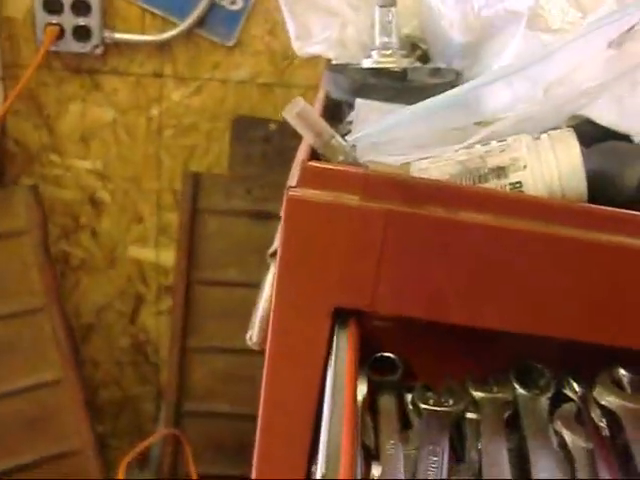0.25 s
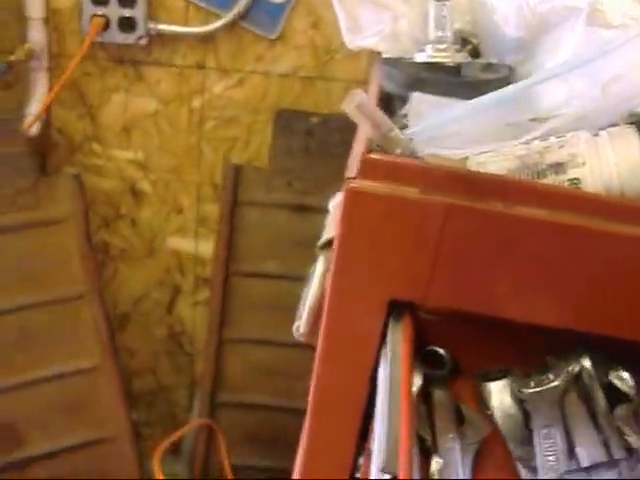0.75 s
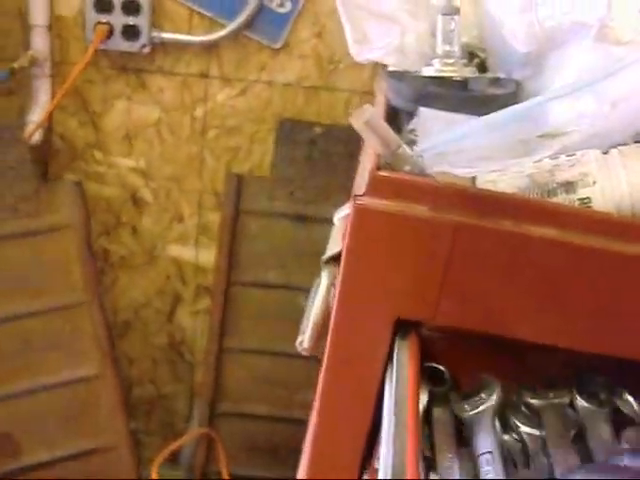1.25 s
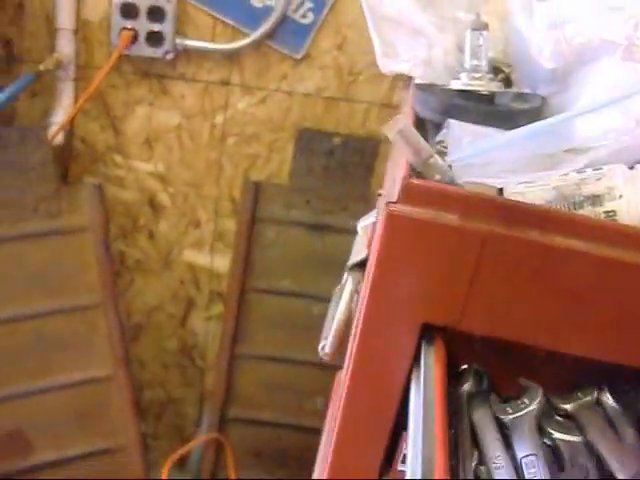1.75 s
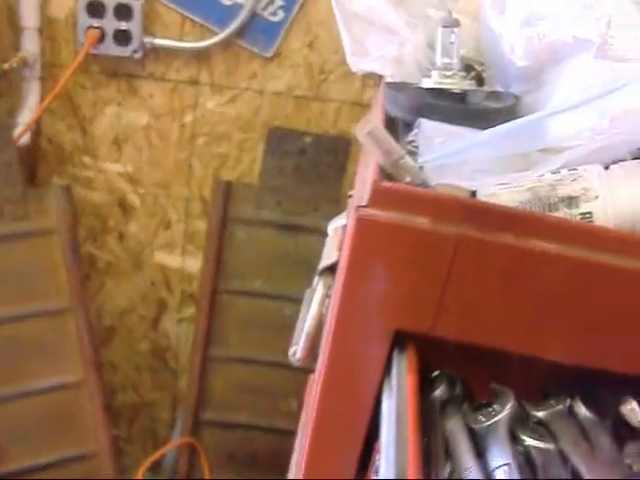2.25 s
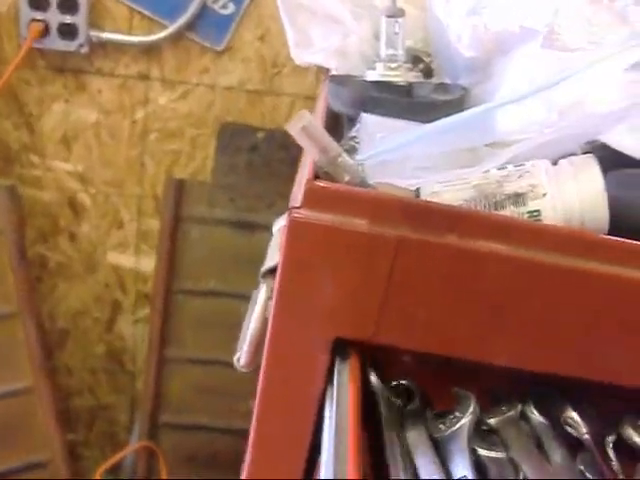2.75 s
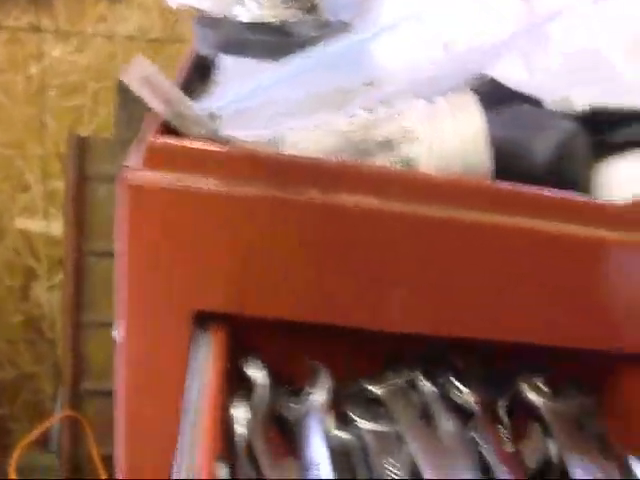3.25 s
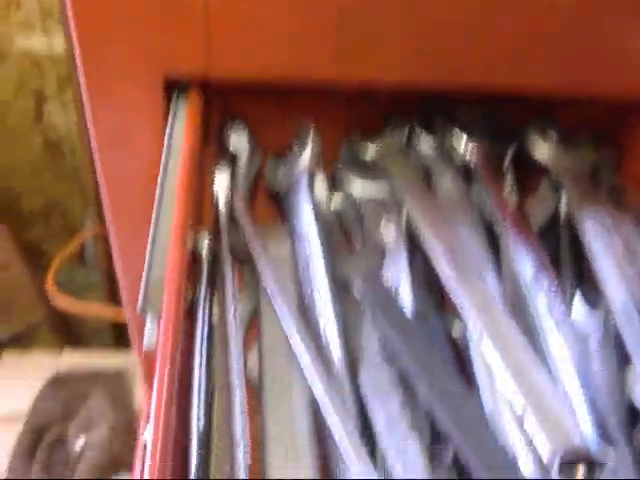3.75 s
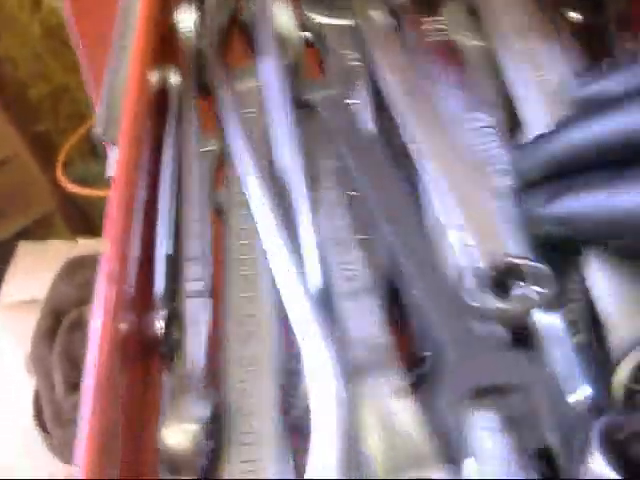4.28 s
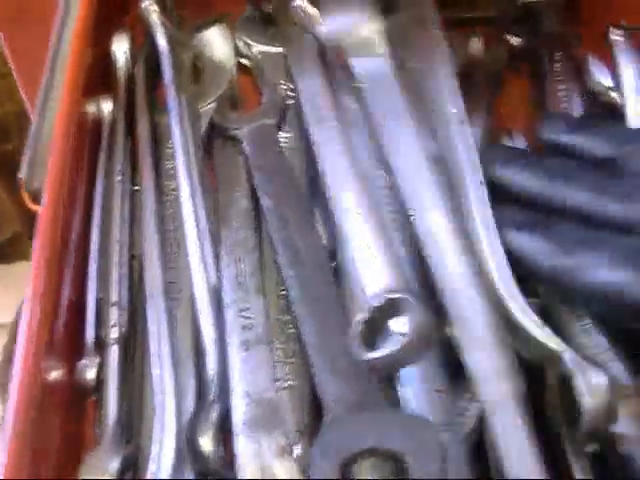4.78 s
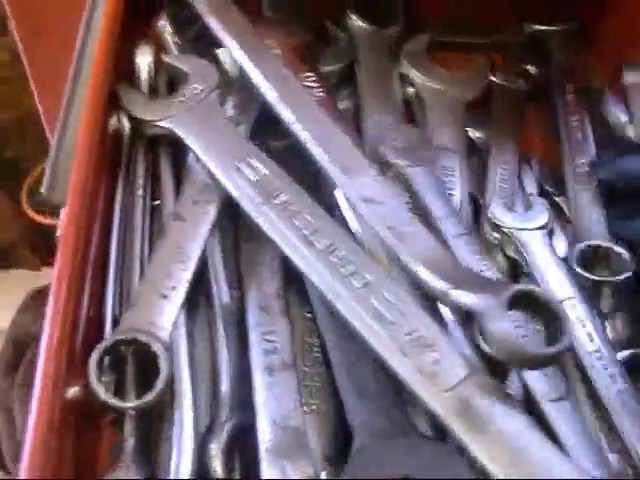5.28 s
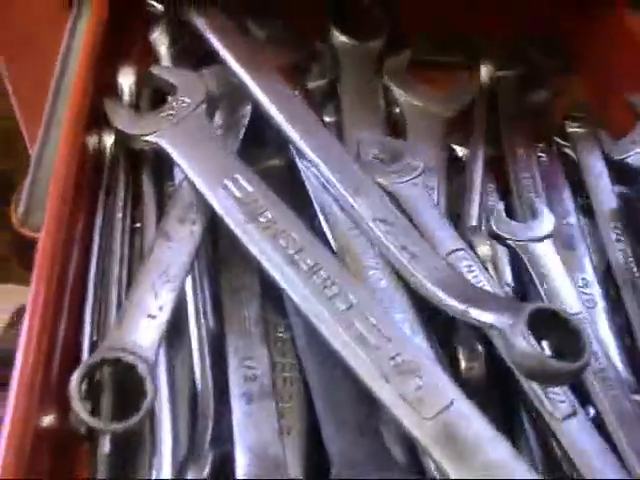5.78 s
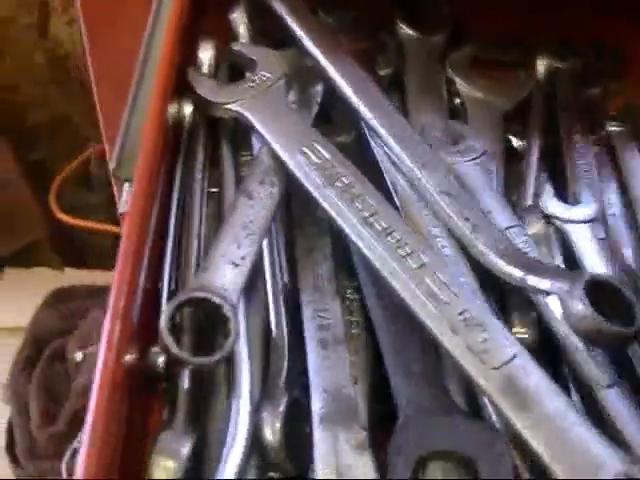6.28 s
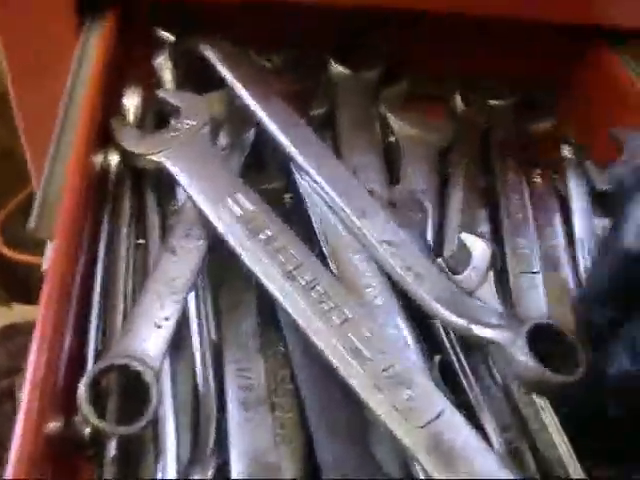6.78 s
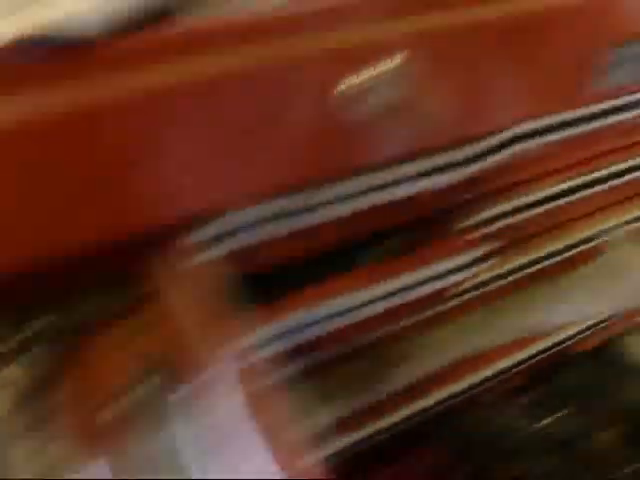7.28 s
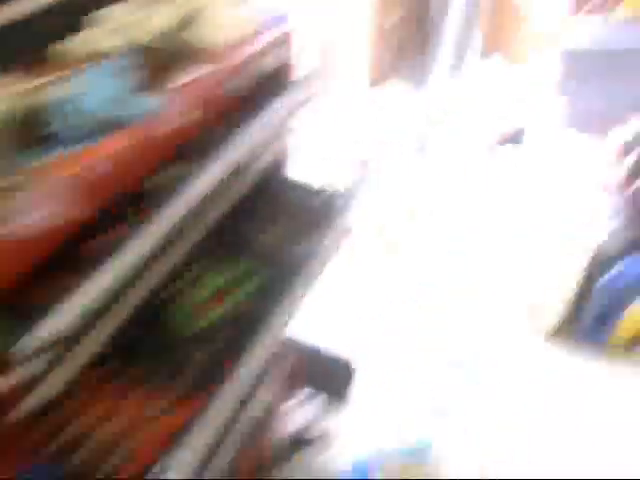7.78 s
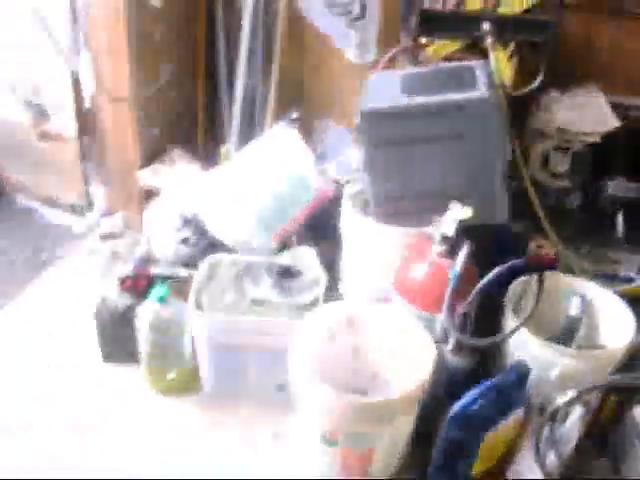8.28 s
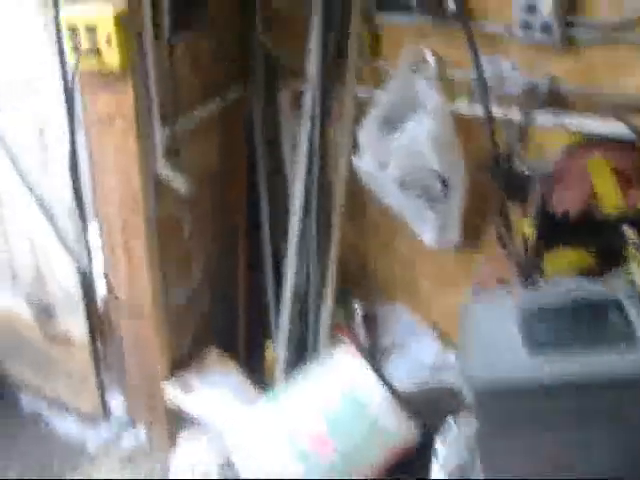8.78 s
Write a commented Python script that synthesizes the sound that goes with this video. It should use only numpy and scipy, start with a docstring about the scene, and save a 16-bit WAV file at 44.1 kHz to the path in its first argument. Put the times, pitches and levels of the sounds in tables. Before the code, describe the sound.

Steel wrenches are shoved and dropped on one another in a tool chest drawer, close and loud, in a fairly dry workshop with a soft low hum. Bursts of bright clatter alternate with near-quiet and small dull knocks; the longest run comes in the middle. A last jangling burst ends abruptly, leaving rough room noise that swells slightly and sparse faint clicks.

```python
"""Over a quiet, humming workshop, a gloved hand rummages through steel wrenches in a tool chest drawer.
Clacks and dragging are shaped noise: jangling cracks that also shake the sheet-metal drawer pan.
Dull knocks push noise into the pan's resonances; wrenches hanging free ring as fading sine tones
until they touch the pile again. Shoves sound the low tones of the whole chest.
The workshop is filtered noise with a wavering hum, and a faint tail follows the tools."""
import sys
import numpy as np
from scipy import signal
from scipy.fft import rfft, irfft, next_fast_len
from scipy.io import wavfile
from scipy.ndimage import uniform_filter1d, map_coordinates

SR = 44100
rng = np.random.default_rng(int(sys.argv[2]) if len(sys.argv) > 2 else 0)


def bounce(signal):
    """Save signal as a 16-bit WAV file at the path given by the first command-line argument."""
    frames = np.transpose(np.atleast_2d(signal))
    limited = np.clip(frames, -1, 1)
    pcm = np.round(limited * 32767).astype(np.int16)
    wavfile.write(sys.argv[1], SR, pcm)


N = 398223  # length of the scene in samples

# Levels of the tools are before the gains in the layer functions. A t60 is the time to fade by 60 dB.
# colour of the workshop noise, relative: (frequency [Hz], level [dB])
WORKSHOP_COLOUR = [(13, -34), (22, -18.5), (85, -1), (175, -11.5), (207, -6), (350, -11), (501, -13),
                   (847, -13), (1840, -18.5), (3290, -23.5), (4330, -31), (14600, -49.5), (16400, -47)]
# how loud the workshop is: (time [s], background level [dB], hum level [dB])
WORKSHOP_LEVELS = [(0, -56.5, -56), (.5, -52.5, -71), (.9, -59, -68), (2, -58, -61.5), (3.5, -60, -71),
                   (3.95, -57.5, -63.5), (6.2, -57.5, -61), (7.4, -59.5, -70.5), (8.2, -54.5, -63.5),
                   (8.7, -50.5, -57.5), (9.03, -51.5, -47.5)]
# strokes of the hand, each dragging the pile into a continuous rattle:
# (start [s], end [s], level at the start [dB], level at the end [dB])
STROKES = [(0, 0.145, -26, -34.5), (0.572, 0.72, -17.5, -22), (.725, 0.79, -28, -42.5),
           (1.142, 1.203, -37, -33.5), (1.207, 1.378, -20.5, -25), (1.39, 1.61, -34.5, -30.5),
           (1.62, 1.764, -17.5, -27.5), (1.946, 2.104, -63, -48.5), (2.157, 2.277, -50.5, -44.5),
           (2.496, 2.593, -45, -39.5), (2.731, 2.856, -28.5, -29), (2.87, 2.942, -39, -43.5),
           (2.994, 3.105, -44, -39.5), (3.099, 3.299, -26.5, -26), (3.3, 3.38, -32.5, -45.5),
           (4.04, 4.188, -43, -44), (4.256, 4.321, -48.5, -34), (4.332, 4.499, -19, -20),
           (4.505, 4.724, -24.5, -29.5), (4.792, 4.84, -24.5, -26.5), (4.849, 5.147, -24, -23),
           (5.161, 5.333, -24, -29), (5.34, 5.39, -36.5, -42.5), (5.403, 5.464, -26, -22),
           (5.472, 5.603, -16, -22), (5.62, 5.69, -50, -41.5), (5.692, 5.818, -21.5, -31.5),
           (5.844, 5.907, -27.5, -41.5), (6.418, 6.543, -24, -23), (6.552, 6.58, -35, -37),
           (6.595, 6.744, -25, -25), (6.74, 6.862, -25, -37), (6.908, 7.002, -39.5, -26.5),
           (7.007, 7.181, -19, -25), (7.17, 7.248, -32, -44.5), (7.86, 8.008, -60, -61)]
# one wrench sliding briefly over another, swelling and fading: (middle [s], level [dB], length [s])
SLIDES = [(.641, -16, .04), (.68, -15, .06), (0.733, -24.5, 0.054), (3.129, -22.5, 0.015),
          (3.237, -19, 0.022), (4.45, -12, .07), (4.87, -16.5, 0.02), (4.969, -17, 0.086),
          (5.018, -18, 0.03), (5.072, -16.5, 0.045), (5.184, -16.5, 0.022), (5.23, -16.5, 0.036),
          (5.291, -24.5, 0.034), (5.502, -20, .04), (5.595, -23.5, 0.043), (6.448, -17, 0.013),
          (6.53, -20, 0.027), (6.654, -16.5, 0.019), (7.033, -16, 0.06), (7.89, -55, .05)]
# separate clacks of steel on steel: (time [s], peak level [dB], treble over the peak [dB])
CLACKS = [(0.017, -12, -18), (0.055, -1.5, -10.5), (0.073, -1, -13), (0.101, -15, -14), (0.131, -16, -11),
          (0.219, -38, -22), (0.548, -24, -24), (0.559, -14, -10), (0.57, -1, -12.5), (0.61, 1, -16),
          (0.624, 2, -13), (0.666, -1.5, -13), (0.744, -17.5, -14), (1.055, -41, -20), (1.141, -14.5, -9.5),
          (1.182, -11.5, -18), (1.211, -4, -14.5), (1.239, 0.5, -12), (1.271, 0.5, -10), (1.326, -4, -8.5),
          (1.366, -7.5, -10), (1.455, -16.5, -14), (1.47, -17, -8), (1.479, -8, -10.5),
          (1.518, -7.5, -25.5), (1.575, -17.5, -16), (1.618, -4, -7.5), (1.681, -10, -9.5),
          (1.696, -3, -8.5), (1.714, 3.5, -19.5), (1.81, -14, -12), (1.954, -46, -20), (2.075, -36, -22),
          (2.094, -34.5, -27), (2.168, -37, -24), (2.181, -29, -19), (2.195, -28.5, -14), (2.227, -34, -23),
          (2.276, -37, -15), (2.387, -33, -22), (2.396, -36, -22), (2.468, -35, -20), (2.504, -27.5, -18),
          (2.52, -31, -8), (2.556, -3, -11.5), (2.589, -24, -18), (2.662, -33, -22), (2.724, -8, -20),
          (2.75, -8, -15), (2.763, 2.5, -11), (2.785, -1.5, -11), (2.806, 0, -9.5), (2.849, -3.5, -17),
          (2.863, -8, -15), (2.991, -25.5, -30), (3.007, -10, -15.5), (3.049, -18, -15),
          (3.058, -17.5, -19), (3.081, -21, -25), (3.101, -11, -9), (3.108, 3, -13), (3.197, -3.5, -11.5),
          (3.263, 4.5, -8.5), (3.375, -22, -17), (4.032, -25, -16.5), (4.047, -21.5, -20),
          (4.067, -10, -15), (4.14, -12, -21), (4.152, -10, -12.5), (4.192, -21.5, -11),
          (4.253, -18, -10.5), (4.291, -29, -13), (4.299, -12.5, -11), (4.321, -9.5, -14.5),
          (4.331, -4, -20.5), (4.36, -2.5, -12.5), (4.377, -1.5, -9), (4.417, 3, -12), (4.431, -1, -11),
          (4.549, -6.5, -11.5), (4.58, -14.5, -7), (4.61, -0.5, -6.5), (4.654, -6.5, -16), (4.694, -11, -7),
          (4.765, -16, -8), (4.784, -3, -16), (4.822, -7, -9), (4.839, 0.5, -11), (4.89, -5.5, -2.5),
          (4.921, -2, -15), (4.941, 1, -10), (5.046, -5, -13), (5.063, -2.5, -16), (5.116, -1.5, -14),
          (5.162, -3, -8.5), (5.227, -8.5, -12), (5.267, -10, -10), (5.401, -11, -4), (5.444, -7, -21),
          (5.473, -4.5, -18), (5.533, -1.5, -11), (5.592, -17, -14), (5.691, -3, -8), (5.741, -3, -8.5),
          (5.765, -2, -9), (5.845, -11.5, -6), (5.871, -5, -16), (5.932, -21, -13.5), (6.036, -22, -6),
          (6.046, -9, -1.5), (6.124, -15, -12), (6.145, -20.5, -21), (6.197, -29, -17), (6.266, -41, -8),
          (6.39, -38, -20), (6.407, -16, -4.5), (6.434, -9.5, -10.5), (6.471, -3, -11), (6.493, -1.5, -5),
          (6.582, -11, -12), (6.597, -2.5, -14.5), (6.639, -5, -7.5), (6.691, -4, -10), (6.707, 2, -12.5),
          (6.762, -9.5, -8), (6.802, -8.5, -13), (6.817, -8.5, -13), (6.846, -8.5, -23), (6.884, -26, -17),
          (6.917, -5, -18.5), (6.959, -13, -9), (6.971, -8, -3.5), (7.008, -3, -6.5), (7.072, -1, -13.5),
          (7.108, 3.5, -14), (7.141, 2, -15.5), (7.201, -8.5, -14), (7.246, -4.5, -14.5),
          (8.583, -23.5, -15), (8.615, -29, -7), (8.631, -28.5, -9), (8.638, -30, -6), (8.962, -30, -4)]
# colour of a crack, relative: (frequency [Hz], level [dB])
STEEL_COLOUR = [(410, -19), (700, -0.5), (911, -8), (1450, -1.5), (3500, -1), (4730, -4), (6500, 1),
                (7030, 0.5), (11000, 2.5), (15300, -19), (16400, -60)]
# resonances of the drawer's sheet-metal pan: (frequency [Hz], width [Hz], relative level [dB])
PAN_MODES = [(294, 110, -4.5), (500, 80, 1.5), (610, 100, 1.5), (763, 90, 1.5), (1023, 100, 2),
             (1447, 120, 2), (2180, 180, -3), (2760, 320, -12)]
# how strongly the pan answers, over the rule for its knock: (time [s], level [dB])
PAN_LEVEL = [(0, -1), (1.3, -1.5), (2.2, 3), (2.8, 2.5), (4.1, -1), (4.6, 1.5), (5.3, -1), (5.7, 1.5),
             (6.1, -3.5), (7.1, 1.5), (9, -4)]
# dull knocks on the pan, each waking the resonances near one pitch:
# (time [s], level [dB], pitch [Hz], t60 [s])
KNOCKS = [(.03, -26, 750, 0.091), (1.96, -47, 800, .08), (2.074, -41.5, 700, 0.081), (2.094, -44, 900, .05),
          (2.18, -40, 1100, .08), (2.195, -42, 1497, .05), (2.226, -40, 797, 0.078),
          (2.243, -39, 900, 0.08), (2.387, -41, 1100, 0.097), (2.468, -43, 1900, .04),
          (2.665, -38, 1500, .07), (3.2, -22, 1450, .1), (3.222, -24, 900, .06), (4.92, -15, 749, .07),
          (4.94, -16, 600, .06), (5.075, -23, 550, .06), (6.975, -25, 650, .08), (7.108, -18, 650, 0.075),
          (8.583, -37, 2100, .06), (8.647, -44, 1600, .03), (8.53, -44, 450, .07), (8.79, -47, 1300, .2),
          (8.91, -43, 2000, .08)]
# tones of each wrench, by wrench name: (frequency [Hz], level [dB], t60 [s])
WRENCH_MODES = { "long": [(1468, -4, .13), (4476, 4, .15), (5660, -4, .1), (7425, -6, .22), (9043, -3, .1),
                (9865, -9, .12), (10897, -3, .25), (12770, -15, .15), (13525, -4, .12), (14270, -16, .17)],
                "wide": [(4952, -8, .2), (5360, -7, .1), (6420, 0, .22), (9195, -3, .18), (11154, -11, .2),
                (12790, -20, .2)], "bent": [(6460, -2, .15), (8268, 0, .15), (11490, -8, .15),
                (12489, -3, .12), (13700, -12, .15)], "thin": [(7665, 0, .25), (11412, -8, .15),
                (13010, -14, .15), (13650, -20, .15), (14860, -16, .15)], "short": [(9060, -2, .15),
                (11326, 0, .25), (12320, -9, .15), (13250, -15, .2)], "stubby": [(6503, -8, .15),
                (9517, -5, .15), (10594, 0, .25)], "flat": [(5986, -7, .17), (8139, -10, .15),
                (9948, -6, .12), (11068, -3, .15), (14090, -20, .2)], "dark": [(8150, 0, .1),
                (8705, -10, .5), (9385, -5, .25), (12700, -14, .25), (14280, -17, .25)],
                "small": [(6675, -6, .15), (10335, 0, .25), (13135, -12, .2), (14771, -14, .25)]}
# blows that leave a wrench ringing: (time [s], wrench name, level [dB], time until it is damped [s])
RINGS = [(0.611, "long", -22, 0.12), (.7, "dark", -40, 0.17), (1.246, "dark", -17.5, .1),
         (1.24, "wide", -21.5, 0.08), (1.327, "wide", -11, 0.085), (1.618, "short", -16, 0.094),
         (1.68, "long", -22, 0.09), (2.772, "long", -26.5, 0.06), (3.164, "long", -26.5, 0.035),
         (3.198, "long", -20, 0.04), (3.257, "long", -15, 0.22), (4.432, "dark", -20, .05),
         (4.453, "wide", -16, .1), (4.553, "long", -29, 0.055), (4.63, "stubby", -31, 0.07),
         (4.691, "stubby", -23.5, 0.055), (4.84, "bent", -15.5, 0.074), (4.94, "dark", -14, 0.088),
         (4.989, "short", -20.5, .06), (5.044, "small", -17.5, 0.14), (5.081, "thin", -16.5, 0.08),
         (5.115, "thin", -17, 0.014), (5.23, "thin", -23, 0.045), (5.263, "thin", -18, 0.071),
         (5.4, "short", -23, 0.072), (5.532, "small", -20, 0.08), (5.551, "long", -28.5, .07),
         (5.69, "flat", -25, .05), (5.745, "thin", -23, .1), (5.773, "flat", -18, 0.059),
         (6.444, "short", -25, .05), (6.469, "dark", -21, 0.11), (6.51, "small", -20.5, 0.044),
         (6.638, "flat", -13, 0.017), (6.719, "flat", -20, 0.03), (6.758, "flat", -21, 0.034),
         (7.013, "short", -30.5, 0.026), (7.052, "short", -18, 0.085), (7.155, "short", -20, 0.11),
         (7.247, "small", -47, 0.35)]
# shoves that shake the whole chest: (time [s], level [dB])
THUMPS = [(0.63, -33), (1.67, -45), (3.26, -23), (4.425, -24), (4.455, -29), (4.579, -37), (4.84, -24),
          (4.87, -31), (4.957, -22), (4.982, -25), (5.063, -23), (5.088, -28), (5.115, -25), (5.53, -29),
          (5.692, -25), (6.492, -30), (6.655, -36), (7.005, -31), (7.105, -32), (8.312, -44), (8.53, -42)]
# low tones of the whole chest: (frequency [Hz], level [dB])
CHEST_MODES = [(55, -6), (95, -4), (160, -2), (260, 1)]
# how long the drawer and room answer: (frequency [Hz], t60 [s])
TAIL_T60 = [(200, .3), (2000, .2), (15000, .1)]

HUM_HZ = 188
FIRM_DB = -12  # level of a firm contact
# knock of the pan under a firm clack, and its change per dB of strength: softer ones are mostly pan
KNOCK_DB, KNOCK_PER_DB = -10, -0.5
# treble of a firm drag over its body, and its change per dB: gentler ones are duller
DRAG_BRIGHT_DB, DRAG_BRIGHT_PER_DB = -3, 0.85
DRAG_KNOCK_DB, DRAG_KNOCK_PER_DB = -0.5, 0.23  # the same for the pan under a drag
CREST_DB = 11  # peak of a clack over its rms
RISE_S = 0.0039  # time in which a clack comes up by 60 dB
DECAY_S, DECAY_S_PER_DB = 0.078, 0.0012  # t60 of a firm clack; softer ones die sooner
EDGE_LASTS, PAN_LASTS = 0.61, 1.5  # times the body's t60: treble dies faster, the pan slower
GRIP_S, SETTLE_S = 0.05, 0.081  # time for a stroke to rise and to die away by 60 dB
KNOCK_SPREAD = 0.6  # how far from its pitch a knock reaches [octaves]
THUMP_RISE_S, THUMP_T60_S = 0.0046, 0.1
TOP_HZ = 16400  # no sound is kept from here up


def amp(db):
    """Turns decibels into a gain."""
    return 10 ** (np.asarray(db) / 20)


def unit(x):
    """Scales a sound to an rms of 1."""
    return x / np.sqrt(np.mean(x ** 2) + 1e-20)


def along(points, hz):
    """Reads a curve of (frequency, value) points on a log frequency axis."""
    f, v = np.transpose(points)
    return np.interp(np.log(hz + 1), np.log(f + 1), v)


def curves(rows):
    """Gives one value per sample for each column after the time."""
    times, *columns = np.transpose(rows)
    return [np.interp(np.arange(N) / SR, times, column) for column in columns]


def wobble(rate):
    """Draws a smooth random curve through `rate` random points a second."""
    points = rng.standard_normal(int(N * rate / SR) + 4)
    return map_coordinates(points, [np.arange(N) * rate / SR])


def filtered(x, response):
    """Multiplies the spectrum of x by a function of frequency."""
    m = next_fast_len(N + SR // 2)  # spare room keeps the end from wrapping onto the start
    return irfft(rfft(x, m) * response(np.fft.rfftfreq(m, 1 / SR)), m)[..., :N]


def noise(spectrum):
    """Coloured noise of rms 1."""
    return unit(filtered(rng.standard_normal(N), lambda hz: amp(along(spectrum, hz))))


def workshop():
    """Patchy background noise, a thin hiss, and a low hum made of a narrow band of noise that wavers."""
    air_db, hum_db = curves(WORKSHOP_LEVELS)
    air = amp(air_db + 0.8 * wobble(7)) * noise(WORKSHOP_COLOUR)
    hiss = amp(air_db - 11.5) * noise([(1500, -28.5), (4000, 0.5), (15000, -4.5)])
    band = filtered(rng.standard_normal(N), lambda hz: 1 / (1 + ((hz - HUM_HZ) / 10) ** 2))
    hum = amp(hum_db + 2.5 * wobble(6.9)) * unit(band)
    return air + hiss + hum


def jangle(depth):
    """White noise in which scattered narrow modes flare up and die, as in a heap of loose steel."""
    hz, _, z = signal.stft(rng.standard_normal(N), SR, nperseg=768, noverlap=640)
    struck = (rng.random(z.shape) < 0.012) * amp(3.5 * rng.standard_normal(z.shape))
    spread = uniform_filter1d(struck, size=2, axis=0)
    dying = signal.lfilter([1], [1, -amp(-1.3)], spread, axis=1)  # 1.3 dB lost per frame
    # low modes are damped by the pile, high ones stand out
    freedom = 0.12 + 0.88 / (1 + (5000 / (hz[:, None] + 1)) ** 4)
    flaring = z * (1 + depth * freedom * unit(dying))
    return signal.istft(flaring, nperseg=768, noverlap=640)[1][:N]


def steel_bands(split_hz):
    """The jangle in the colour of steel, as a lower and an upper part of equal rms."""
    crack = filtered(jangle(depth=1.8), lambda hz: amp(along(STEEL_COLOUR, hz)))
    upper = filtered(crack, lambda hz: 1 / (1 + (split_hz / (hz + 1)) ** 6))
    return unit(crack - upper), unit(upper)


def pan(hz):
    """Response of the sheet-metal pan: a sum of resonances whose signs alternate."""
    response = 0
    for k, (centre, width, db) in enumerate(PAN_MODES):
        push = 1j * hz * width
        response = response + (-1) ** k * amp(db) * push / (centre * centre - hz * hz + push)
    return response


def shares(db, bright_db, knock_db, knock_slope):
    """Levels of body, bright edge and pan knock for a contact of this strength."""
    return db + np.array([0 * db, bright_db, knock_db + knock_slope * (db - FIRM_DB)])


def drag_shares(db):
    """Shares for dragged steel: gentler is duller."""
    bright_db = DRAG_BRIGHT_DB + DRAG_BRIGHT_PER_DB * (db - FIRM_DB)
    return shares(db, bright_db, DRAG_KNOCK_DB, DRAG_KNOCK_PER_DB)


def add_strokes(drags):
    """Adds the rattle of each stroke, which rises, runs from one level to another and settles."""
    for start, end, start_db, end_db in STROKES:
        first = max(round((start - GRIP_S) * SR), 0)
        last = min(round((end + SETTLE_S) * SR), N)
        span = np.arange(first, last)
        times = [start - GRIP_S, start, end, end + SETTLE_S]
        levels_db = [start_db - 60, start_db, end_db, end_db - 60]
        drags[:, span] += amp(2 * drag_shares(np.interp(span / SR, times, levels_db)))


def contact_powers():
    """Power of the crack's body, bright edge and pan knock: for the clacks, and for slides and rattle."""
    hits, drags = np.zeros((2, 3, N + SR))
    t = np.arange(-SR // 10, SR // 4) / SR
    for s, peak_db, bright_db in CLACKS:
        strength_db = peak_db - CREST_DB
        t60 = DECAY_S + DECAY_S_PER_DB * (strength_db - FIRM_DB)
        lasts = np.maximum(t60 * np.array([[1], [EDGE_LASTS], [PAN_LASTS]]), 0.01)
        level_db = shares(strength_db, bright_db, KNOCK_DB, KNOCK_PER_DB)
        fall = np.where(t < 0, (t / RISE_S) ** 2, t / lasts)
        at = round((s + RISE_S / 2) * SR)  # the listed time lies halfway up the rise
        hits[:, at:at + len(t)] += amp(2 * (level_db[:, None] - 60 * fall))  # doubled dB gives power
    for s, db, length in SLIDES:
        bump = np.exp(-(3 * t / length) ** 2)
        drags[:, round(s * SR):][:, :len(t)] += amp(2 * drag_shares(db))[:, None] * bump
    # drop the lead-in that made room for shapes starting before time zero
    hits, drags = hits[:, SR // 10:][:, :N], drags[:, SR // 10:][:, :N]
    add_strokes(drags)
    return hits, drags


def clacks_and_drags():
    """Clacks are clean cracks, dragging is a grainy cluster of tiny impacts; both jangle and shake the pan."""
    t = np.arange(SR // 20) / SR
    impacts = (rng.random(N) < 250 / SR) * amp(4 * rng.standard_normal(N))  # about 250 a second
    fading_impacts = signal.fftconvolve(impacts, amp(-60 * t / 0.025))[:N]
    grain = unit(1.3 + unit(fading_impacts))
    hits, drags = contact_powers()
    body, edge, knock = np.sqrt(hits + drags * grain ** 2)
    low, high = steel_bands(split_hz=4910)
    sheet = unit(filtered(jangle(depth=1.0), pan)) * amp(curves(PAN_LEVEL)[0])
    return amp(-2.5) * body * low + amp(4.5) * edge * high + amp(-4.5) * knock * sheet


def knocks():
    """A short rough push into the pan's resonances around the knock's pitch."""
    out, t = np.zeros(N + SR), np.arange(SR // 5) / SR
    hz = np.fft.rfftfreq(len(t), 1 / SR)
    pushes = rng.standard_normal((len(KNOCKS), len(t)))
    for (s, db, pitch_hz, t60), push in zip(KNOCKS, pushes):
        near = np.exp(-0.5 * (np.log2((hz + 1) / pitch_hz) / KNOCK_SPREAD) ** 2)
        fade = amp(-60 * t / t60) * (1 - np.exp(-t / 0.002))
        sound = fade * irfft(rfft(push) * pan(hz) * near, len(t))
        # give the sound the energy of its fade, whatever the resonances let through
        level = amp(db) * np.linalg.norm(fade) / np.linalg.norm(sound)
        out[round(s * SR):][:len(t)] += level * sound
    return out[:N]


def rings():
    """A struck wrench sounds its modes at new strengths and falls silent fast once it lies on the pile."""
    out, t = np.zeros(N + SR), np.arange(SR // 3) / SR
    all_luck = rng.standard_normal((len(RINGS), 2, 10))
    for (s, name, db, free), luck in zip(RINGS, all_luck):
        damping = amp(-60 * np.maximum(t - free, 0) / 0.02) * (1 - np.exp(-t / 0.0015))
        tone = np.zeros(len(t))
        for (hz, level, t60), strength, phase in zip(WRENCH_MODES[name], *luck):
            fade = amp(level + 2 * strength - 60 * t / t60)
            tone += fade * np.sin(2 * np.pi * hz * t + 3 * phase)
        out[round(s * SR):][:len(t)] += amp(db) * damping * tone
    # touching neighbours makes the ring flutter
    return out[:N] * amp(0.55 * wobble(60))


def thumps():
    """Each shove briefly sounds the chest's low modes, a little differently every time."""
    out, t = np.zeros(N + SR), np.arange(SR // 4) / SR
    puff = amp(-60 * t / THUMP_T60_S) * (1 - np.exp(-t / THUMP_RISE_S))
    all_luck = rng.standard_normal((len(THUMPS), 2, len(CHEST_MODES)))
    for (s, db), luck in zip(THUMPS, all_luck):
        tone = np.zeros(len(t))
        for (hz, level), strength, detune in zip(CHEST_MODES, *luck):
            tone += amp(level + 3 * strength) * np.sin(2 * np.pi * hz * (1 + 0.1 * detune) * t)
        out[round(s * SR):][:len(t)] += amp(db) * puff * tone
    return out[:N]


def tail(x):
    """The surroundings answer as fading noise, in which each frequency dies at its own speed."""
    hz, t, z = signal.stft(rng.standard_normal(SR // 2), SR, nperseg=256)
    fade = amp(-60 * t / along(TAIL_T60, hz)[:, None])
    echo = signal.istft(z * fade, SR, nperseg=256)[1]
    delayed = np.pad(x, (200, 0))  # 200 samples
    return signal.fftconvolve(delayed, echo / np.linalg.norm(echo))[:N]


def scene():
    """The tools with their tail and the thumps of the chest, over the workshop."""
    tools = clacks_and_drags() + knocks() + rings()
    return (tools + amp(-22) * tail(tools) + thumps() + workshop())[None]


def record(dry):
    """Peaks flatten at full scale; the top treble rolls off and nothing is kept from TOP_HZ up."""
    soft = dry / (1 + np.abs(dry) ** 8) ** (1 / 8)
    return filtered(soft, lambda hz: (hz < TOP_HZ) / (1 + (hz / 15300) ** 24))


dry = scene()
out = record(dry)
bounce(out)
```